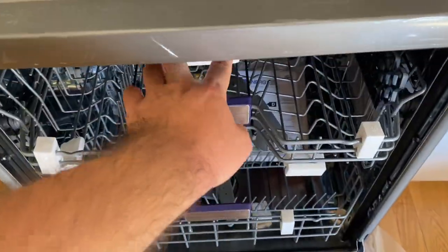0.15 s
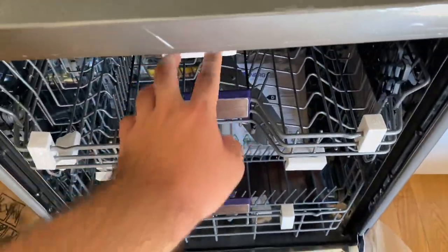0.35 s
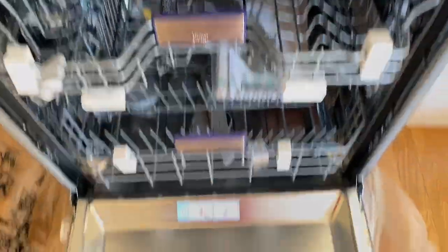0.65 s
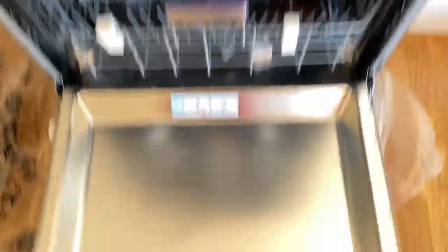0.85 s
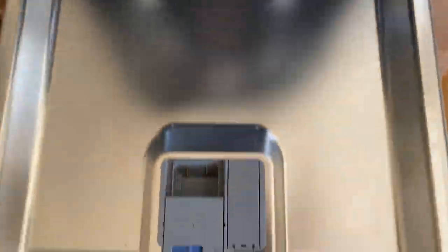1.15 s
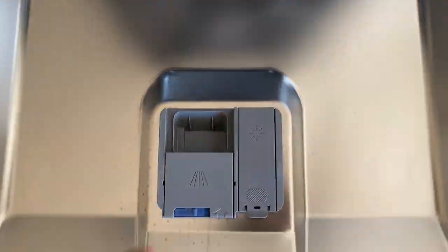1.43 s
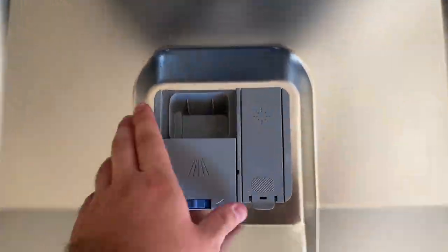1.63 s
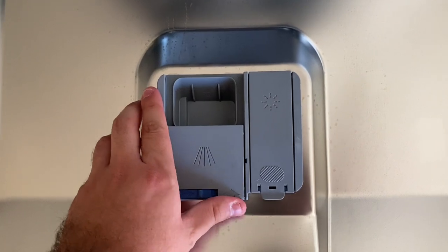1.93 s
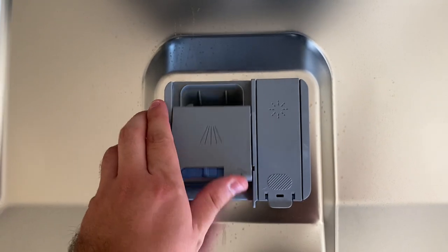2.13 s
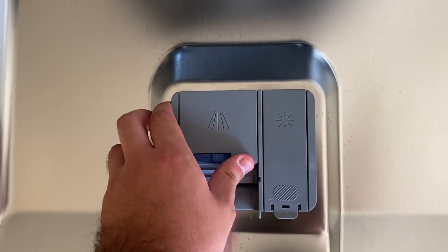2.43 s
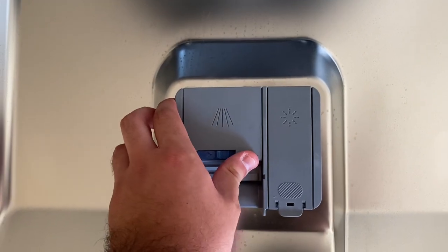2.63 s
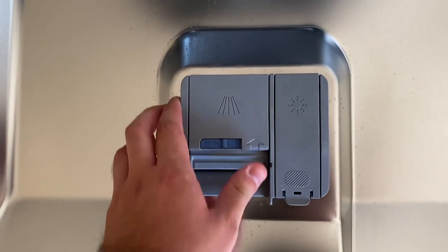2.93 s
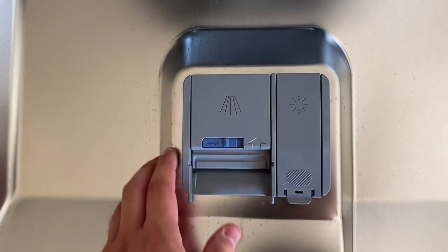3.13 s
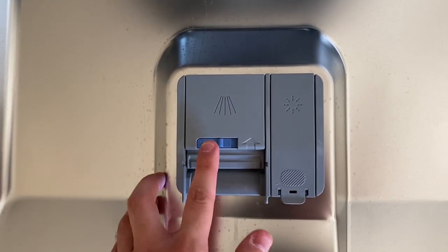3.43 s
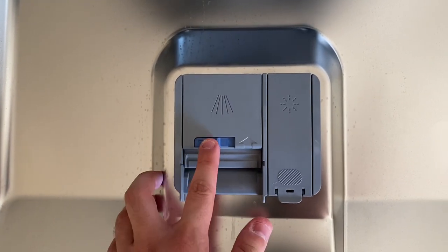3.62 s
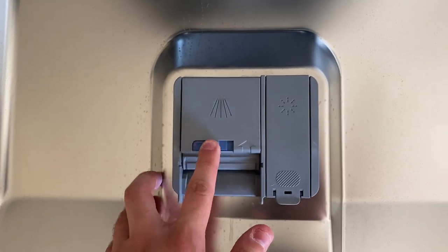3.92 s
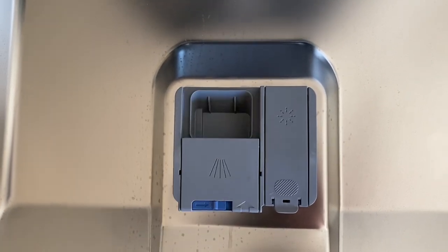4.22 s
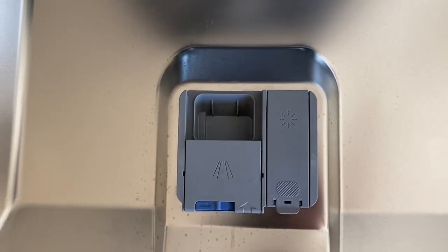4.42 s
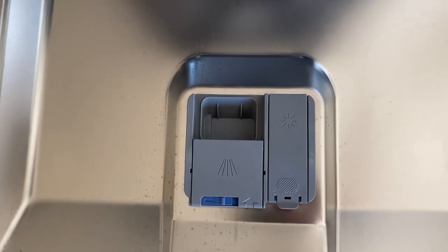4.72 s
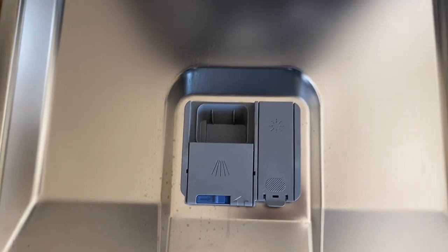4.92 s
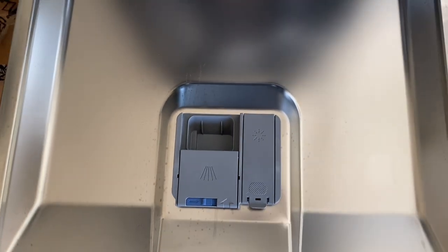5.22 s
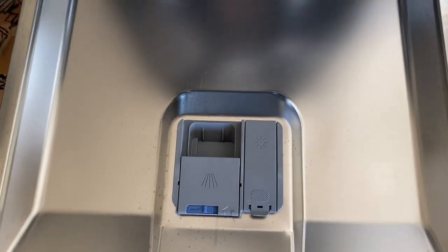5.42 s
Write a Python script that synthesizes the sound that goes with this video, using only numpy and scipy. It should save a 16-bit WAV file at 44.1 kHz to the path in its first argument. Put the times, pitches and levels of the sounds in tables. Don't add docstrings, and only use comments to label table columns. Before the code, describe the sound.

Brief metal rack rattle and thud, quiet rubbing and small clicks, then a sharp click and a hard plastic snap that booms the steel door.

```python
import sys
import numpy as np
from scipy import signal
from scipy.fft import rfft, irfft, next_fast_len
from scipy.io import wavfile
from scipy.ndimage import uniform_filter1d

SR = 44100
rng = np.random.default_rng(int(sys.argv[2]) if len(sys.argv) > 2 else 0)


def generate_wav(sig):
    pcm = np.round(np.clip(np.atleast_2d(sig).T, -1, 1) * 32767).astype(np.int16)
    wavfile.write(sys.argv[1], SR, pcm)


def voltage_ratio(level):
    return 10 ** (np.asarray(level, float) / 20)


N = 245195

# hz, level_db_per_hz
HUM = [(12, -54), (20, -25.5), (34, -21), (81, -3), (100, 1), (120, -26.5), (145, -6), (179, -21),
       (215, -6), (295, -10.5), (328, -13.5), (603, -17), (1300, -27.5), (2320, -40.5), (11000, -64.5),
       (14300, -104), (22000, -120)]
HUM_DB = -48.5
# centre_hz, width_hz, boost_db
HUM_PEAKS = [(97.5, 22, 8), (162, 41, 6), (215, 20, 3.5), (401, 27, 5.5)]
# hz, likeness_0_to_1
SAME = [(40, 0.99), (150, 0.86), (300, 0.83), (600, 0.24), (1600, .15), (5000, 0.033)]
# hz, left_minus_right_db
TILT = [(60, -1.5), (240, -1.5), (950, -0.5), (3770, -2), (15000, 5)]

# hz, level_db_per_hz
RATTLE = [(240, -24), (400, -4.5), (543, -8.5), (694, -11), (860, -4), (942, 1), (2120, -6), (2360, -4),
          (5560, -4), (9790, -22), (11200, -29), (12300, -60.5), (15500, -54.5)]
# hz, level_db_per_hz
RUMBLE = [(18, -52), (30, -5), (69, -8.5), (118, -0.5), (183, -8), (301, -8.5), (362, -15.5), (687, -20),
          (900, -23.5), (1170, -63), (1980, -120)]
# pitch_hz, level_db, t60_s
WIRES = [(310, 0, .04), (510, -1, .035), (680, 0, .03), (940, -4, .03), (2500, -7, .015), (2900, -6, .015),
         (3600, -8, .015), (4600, -7, .012), (5300, -9, .012)]
STOP_S, JOLT_RISE_S, JOLT_FALL_S = .12, 0.013, 0.014
WIRE_DB, WIRE_JOLT_DB, WIRE_SETTLE_DB_PER_S = -36, 15, 700.5
TUB_DB, TUB_JOLT_DB, TUB_SLOWING_DB_PER_S = -24, 13.5, 59.5
TUB_SETTLE_S, TUB_SETTLE_DB_PER_S = .18, 500

# start_s, length_s, level_db, pitch_hz, glide_hz
SQUEAKS = [
    (.092, .014, -35.5, 2902, -500),
    (2.086, .036, -56, 1203, 120),
    (2.23, 0.052, -47.5, 1180, 143),
    (2.262, .014, -39, 1187, -60),
    (3.938, 0.016, -38, 1260, -120),
]
SQUEAK_WOBBLE = .12

# pitch_hz, level_db, t60_s
HOLLOW = [(600, -2, .04), (690, 0, .055), (800, -14, .03), (1000, -9, .04), (1310, -7, .04)]
# pitch_hz, level_db, t60_s
SHELL = [(1890, 0, .035), (2100, -4, .025), (2260, -1, .03), (2420, -2, .035)]
# pitch_hz, level_db, t60_s
EDGE = [(3080, -4, .014), (3400, -4, .014), (4180, -2, .012), (4700, -3, .012), (5300, -4, .01),
        (6010, -2, .012), (6800, 0, .01), (7700, -6, .01), (9700, -3, .012), (10300, -6, .01)]
# hz, level_db_per_hz
CRACK = [(250, -10), (500, -0.5), (700, 6), (1300, -8.5), (1600, -8.5), (2200, -5), (2900, -9), (4300, 1.5),
         (6500, -0.5), (8400, -9), (9800, -5.5), (11200, -14.5), (13500, -20), (16000, -26)]
# time_s, peak_db, hardness_db, left_minus_right_db
THUDS = [
    (1.301, -61, 0, -2),
    (2.263, -30, -2, 3),
    (2.647, -43, 23, .6),
    (2.872, -42.5, -2, 0),
    (2.884, -44, 9, -.6),
    (3.663, -37, 16.5, .6),
    (3.691, -40, 8, 4),
    (3.775, -12.5, 16, 2.5),
]
# time_s, peak_db, hardness_db, left_minus_right_db
CLACKS = [
    (.095, -31, 0.5, -1),
    (.862, -62, 3, 1),
    (2.02, -43.5, -0.5, 1),
    (2.125, -41, -0.5, 7),
    (2.624, -57, 1, -2),
    (3.719, -60.5, -2.5, 20),
    (4.038, -8, 5.5, 0),
    (4.068, -15.5, 12.5, 1),
]
# time_s, peak_db, hardness_db, left_minus_right_db
TICKS = [
    (.113, -29.5, -8.5, -12),
    (.118, -23, 10, 1),
    (.156, -29, -3.5, 2.5),
    (.321, -38, 20, 4),
    (4.008, -29.5, 2.5, 1),
    (4.042, -15, -4.5, 6),
    (4.082, -45, -11, 0.9),
]
# knocks, hollow_shell_edge_db, change_db_per_db_of_hardness
KINDS = [
    (THUDS, (0, -18, -23.5), (0, 0.24, 0.96)),
    (CLACKS, (-5.5, 0, -9.5), (-1.1, 0, 1)),
    (TICKS, (-11.5, -2.5, 0), (-1, -0.79, 0)),
]

# pitch_hz, level_db, t60_s
DOOR = [(102.92, -10, 0.22), (144, -17, 0.079), (165.4, -19.5, 1.1), (196, -16.5, .8),
        (202.65, -12.5, 1.05), (238, -15, 0.47), (220, 10, 0.021), (266.5, -17, 0.91), (269.45, -13, .9),
        (327, -18, .2), (393, -21, 0.54), (438, -23, .4), (580, -24, 0.26)]
# time_s, level_db, contact_ms
BLOWS = [
    (2.022, -32.5, 2.5),
    (2.127, -32.5, 2.1),
    (2.269, -32, 1.06),
    (3.665, -36.5, 1.6),
    (3.691, -43.5, 1.8),
    (4.0428, -3.5, 0.6),
    (4.071, -16.5, 0.86),
]
# time_s, level_db, start_hz, end_hz, t60_s
THUMPS = [
    (0.12, -28.5, 124.4, 67.6, 0.3),
    (0.142, -22, 121.3, 87.4, 0.24),
    (0.167, -24, 96, 72, 0.2),
    (1.079, -21.5, 60, 45, 0.083),
    (2.05, -46, 45, 35, 0.27),
    (2.36, -38, 45, 35, 0.24),
    (5.437, -37, 88.9, 79.4, 0.3),
]

# hz, level_db_per_hz
RUB = [(900, -7.5), (1400, -2), (1750, -10), (2050, -8), (2400, -7), (2750, -9.5), (3200, -5), (3700, 1),
       (4400, 5.5), (5300, 2), (6500, 0), (8400, -11), (9700, -11), (11000, -16.5)]
# start_s, fastest_s, end_s, scrape_db, fizz_re_scrape_db
PALM = [
    (1.41, 1.52, 1.704, -69.5, -20),
    (2.085, 2.105, 2.17, -68, -7),
    (4.4, 4.52, 5.01, -71.5, -28.5),
]
# start_s, fastest_s, end_s, scrape_db, fizz_re_scrape_db
WIPE = [
    (1.66, 1.726, 1.826, -73, -4),
    (1.84, 1.9, 2.16, -74.5, -6),
    (2.012, 2.03, 2.16, -67.5, -19),
]
# start_s, fastest_s, end_s, scrape_db, fizz_re_scrape_db
SLIDE = [
    (2.07, 2.155, 2.298, -57, -6),
    (4.012, 4.038, 4.041, -38, -7),
]
# start_s, fastest_s, end_s, scrape_db, fizz_re_scrape_db
BRUSH = [(2.65, 2.66, 2.66, -64, -25), (2.89, 2.9, 2.8, -68.5, -19), (2.88, 3.0, 3.3, -66.5, 2.5),
         (3.17, 3.224, 3.34, -76.5, 5.5), (2.42, 2.5, 2.56, -80, -12), (2.2, 2.25, 2.29, -65.5, 0.5),
         (4.82, 4.875, 5.09, -61.5, 0.5), (5.12, 5.28, 5.54, -76, -7), (5.19, 5.39, 5.6, -77, -10),
         (5.44, 5.55, 5.7, -70, -7)]
# start_s, fastest_s, end_s, scrape_db, fizz_re_scrape_db
PRESS = [
    (3.785, 3.79, 3.81, -45.5, -14.5),
    (3.8, 3.9, 3.98, -62.5, -17),
    (3.92, 3.945, 4.005, -61.5, -14.5),
]
# strokes, drag_re_scrape_db, drag_pitch_hz, pitch_rise_over_stroke, resonant_share_0_to_1, width_hz
SURFACES = [
    (PALM, 8.5, 2000, 0.033, 0.37, 230),
    (WIPE, 8.1, 1950, .03, 0.35, 370),
    (SLIDE, 3, 2150, -0.11, 0.51, 410),
    (BRUSH, 0.71, 1600, .02, .4, 120),
    (PRESS, 10, 680, .03, 0.61, 500),
]
ENDS_DB, BEND, DRAG_LINGERS, FIZZ_FADES = 19.5, 1.2, .3, .6

# hz, t60_s
KITCHEN = [(100, 0.76), (400, 0.87), (1500, 0.92), (5000, 0.79), (9000, 0.61), (14000, 0.32)]
# hz, left_lead_rad
PORTS = [(50, .02), (500, 0.31), (2400, 1.3), (4000, 1.2), (8000, 1.7), (16000, 0.89)]
# hz, gain_db
MIC = [(20, -2), (1500, 1), (2600, 1), (2900, 1), (5000, -1.5), (6800, 2), (8400, -1.5), (9800, 1),
       (11200, -3.5), (12000, -20), (13500, -2.5), (15500, -12), (16500, -36.5), (22050, -60)]


def evened(x):
    return x / np.sqrt(np.mean(x ** 2) + 1e-20)


def peaked(x):
    return x / abs(x).max()


def read(points, hz):
    f, value = np.transpose(points)
    return np.interp(np.log(hz + 1), np.log(f + 1), value)


def add(mix, s, sound):
    part = mix[..., round(s * SR):][..., :sound.shape[-1]]
    part += sound[..., :part.shape[-1]]


def coloured(x, spectrum):
    size = next_fast_len(len(x))
    gain = voltage_ratio(read(spectrum, np.fft.rfftfreq(size, 1 / SR)))
    return evened(irfft(rfft(x, size) * gain, size)[:len(x)])


def bands(x, edges_hz):
    filters = [signal.butter(3, [lo, hi], "bandpass", fs=SR, output="sos")
               for lo, hi in zip(edges_hz, edges_hz[1:])]
    return [signal.sosfilt(sos, x) for sos in filters]


def grit(per_s, spread_db, smooth, size=N):
    sizes = voltage_ratio(spread_db * np.minimum(rng.exponential(1, size), 4))
    ticks = sizes * (rng.random(size) < per_s / SR)
    return evened(ticks * rng.standard_normal(size)) + smooth * rng.standard_normal(size)


def ring(modes, seconds, detune):
    t = np.arange(round(seconds * SR)) / SR
    chance = rng.uniform(-1, 1, len(modes))
    return sum(voltage_ratio(db - 60 * t / t60) * np.sin(2 * np.pi * hz * (1 + detune * a) * t)
               for (hz, db, t60), a in zip(modes, chance))


def resonate(x, hz, width_hz):
    turn = np.exp(2j * np.pi * np.cumsum(hz) / SR)
    r = np.exp(-np.pi * width_hz / SR)
    return 2 * (turn * signal.lfilter([1 - r], [1, -r], x / turn)).real


def alike(left, other, same):
    return same * left + np.sqrt(1 - same ** 2) * other


def hum():
    frames, hz = N // 512 + 5, np.fft.rfftfreq(2048, 1 / SR)
    a, b, c, d, patches = rng.standard_normal((frames, 1025, 5)).T
    patches = uniform_filter1d(patches, size=12, axis=0)
    patches = evened(uniform_filter1d(patches, size=10, axis=1))
    same = np.clip(read(SAME, hz), -1, 1)[:, None]
    left = a + 1j * b
    z = np.array([left, alike(left, c + 1j * d, same)])
    peaks_db = sum(db / (1 + (2 * (hz - f) / w) ** 2) for f, w, db in HUM_PEAKS)
    shape_db = read(HUM, hz) + peaks_db
    tilt_db = np.multiply.outer([.5, -.5], read(TILT, hz))[..., None]
    z *= voltage_ratio(shape_db[:, None] + 2.0 * patches + tilt_db)
    return voltage_ratio(HUM_DB) * evened(signal.istft(z, nperseg=2048, noverlap=1536)[1][:, :N])


def rack():
    t = np.arange(SR) / SR
    jolt = np.exp(-np.where(t < STOP_S, (STOP_S - t) / JOLT_RISE_S, (t - STOP_S) / JOLT_FALL_S))
    settling_s = np.maximum(t - STOP_S - JOLT_FALL_S, 0)
    wire_db = WIRE_DB + WIRE_JOLT_DB * jolt - WIRE_SETTLE_DB_PER_S * settling_s
    tub_db = TUB_DB + TUB_JOLT_DB * jolt - TUB_SLOWING_DB_PER_S * t
    tub_db -= TUB_SETTLE_DB_PER_S * np.maximum(t - TUB_SETTLE_S, 0)
    ticks = coloured(grit(4000, spread_db=2.5, smooth=0.91, size=SR), RATTLE)
    clanks = np.zeros(SR)
    for mode in WIRES:
        strikes = grit(160, spread_db=3.0, smooth=0, size=SR)
        clanks += signal.oaconvolve(strikes, ring([mode], .08, 0))[:SR]
    tub = coloured(grit(300, spread_db=2.5, smooth=0.9, size=SR), RUMBLE)
    out = np.zeros(N)
    out[:SR] = voltage_ratio(wire_db - 3.5) * (ticks + voltage_ratio(-4.5) * evened(clanks)) + voltage_ratio(tub_db - 3.0) * tub
    return out


def squeaks():
    out, coarse = np.zeros(N), grit(500, spread_db=2.5, smooth=0.62)
    for s, length, db, hz, glide_hz in SQUEAKS:
        u = np.arange(0, length, 1 / SR) / length
        wobble = evened(uniform_filter1d(coarse[round(s * SR):][:len(u)], size=60))
        pitch_hz = (hz + glide_hz * u) * (1 + SQUEAK_WOBBLE * wobble)
        swell = np.sin(np.pi * u ** 0.77) ** 2
        add(out, s, voltage_ratio(db) * swell * np.sin(2 * np.pi * np.cumsum(pitch_hz) / SR))
    return out


def knocks():
    near, far = np.zeros((2, N)), np.zeros(N)
    t = np.arange(round(.06 * SR)) / SR
    rise = 1 - np.exp(-t / 0.00062)
    hits = [(s, db + np.add(colour_db, np.multiply(lean, hard_db)), pan_db)
            for rows, colour_db, lean in KINDS for s, db, hard_db, pan_db in rows]
    shares, fades_s = (.3, .5, .9), (.004, .004, .003)
    wets = voltage_ratio([-4., 1.5, -.5])
    for s, group_db, pan_db in sorted(hits, key=lambda hit: hit[0]):
        chatter = rng.standard_normal(len(t)) * np.exp(-t / 0.0041) * rise
        cracks = bands(coloured(rng.standard_normal(len(t)), CRACK), [480, 1150, 2750, 16500])
        shove = np.diff(np.hanning(56))
        rings = [signal.fftconvolve(shove, ring(HOLLOW, .06, 0.022))]
        rings += [signal.fftconvolve(chatter, ring(modes, 0.036, 0.012)) for modes in (SHELL, EDGE)]
        pan = voltage_ratio([[pan_db / 2], [-pan_db / 2]])
        for gain, crack, rung, share, fade_s, wet in zip(voltage_ratio(group_db), cracks, rings, shares, fades_s, wets):
            rung = peaked(rung[:len(t)])
            sound = share * peaked(crack * np.exp(-t / fade_s) * rise) + np.sqrt(1 - share ** 2) * rung
            add(near, s - .001, voltage_ratio(2.0) * gain * sound * pan)
            add(far, s, wet * gain * (peaked(crack * np.exp(-t / .018)) + .35 * rung))
    return near, far


def door():
    out = np.zeros(N)
    panel = peaked(bands(ring(DOOR, 1.2, 0), [75, 3000])[0])
    for s, db, ms in BLOWS:
        push = np.hanning(round(ms * SR / 1000) + 2)
        add(out, s, voltage_ratio(db) * np.convolve(panel, push / push.sum()))
    for s, db, from_hz, to_hz, t60 in THUMPS:
        t = np.arange(0, t60, 1 / SR)
        hz = to_hz + (from_hz - to_hz) * np.exp(-t / 0.081)
        tone = np.sin(2 * np.pi * np.cumsum(hz) / SR)
        add(out, s, voltage_ratio(db - 60 * t / t60) * tone * (1 - np.exp(-t / 0.013)))
    return out


def rubs():
    treble = [(12000, -15.5), (14000, -12.0), (16000, -11.0)]
    grain = coloured(grit(2900, spread_db=3.0, smooth=2.3), RUB + treble)
    drag, scrape, fizz = map(evened, bands(grain, [900, 2700, 8200, 16000]))
    coarse = grit(500, spread_db=2.5, smooth=0.62)
    grip = uniform_filter1d(uniform_filter1d(coarse[::-1], size=500), size=300)
    uneven_db = 1.3 * evened(grip)
    out = np.zeros(N)
    for strokes, drag_db, lid_hz, rise, share, width_hz in SURFACES:
        for start, top, end, db, fizz_db in strokes:
            live = slice(round(start * SR), min(round(end * SR), N))
            t = np.arange(live.start, live.stop) / SR
            slowness = np.where(t < top, (top - t) / (top - start), (t - top) / (end - top))
            slow_db = ENDS_DB * np.clip(slowness, 0, 1) ** BEND
            on = np.clip(np.minimum(t - start, end - t) / 0.003, 0, 1)
            hz = lid_hz * (1 + rise * (t - top) / (end - start))
            mode = evened(resonate(resonate(coarse[live], hz, width_hz), hz, width_hz))
            overtone = evened(resonate(coarse[live], 2.2 * hz, 300))
            lid = (1 - share) * drag[live] + share * mode + voltage_ratio(-21.0) * overtone
            stroke = scrape[live] + voltage_ratio(drag_db + DRAG_LINGERS * slow_db) * lid
            stroke += voltage_ratio(fizz_db - FIZZ_FADES * slow_db) * fizz[live]
            out[live] += on * voltage_ratio(db - slow_db + uneven_db[live]) * stroke
    return out


def kitchen(x, gap_s=0.002):
    taps = rng.standard_normal((2, SR))
    hz, t, z = signal.stft(taps, SR, nperseg=256)
    z[1] = alike(z[0], z[1], np.clip(read(SAME, hz), -1, 1)[:, None])
    decay = voltage_ratio(-60 * t / read(KITCHEN, hz)[:, None])
    tail = signal.istft(z * decay, SR, nperseg=256)[1]
    tail *= np.clip(np.arange(tail.shape[1]) / SR / gap_s - .5, 0, 1)
    return signal.fftconvolve(x[None], tail / np.linalg.norm(tail[0]), axes=1)[:, :N]


def ports(x):
    size = next_fast_len(N + 4096)
    hz = np.fft.rfftfreq(size, 1 / SR)
    phase = np.exp(.5j * np.outer([1, -1], read(PORTS, hz)))
    return irfft(rfft(x, size) * voltage_ratio(read(MIC, hz)) * phase, size)[:, :N]


def scene():
    floor, roll, rub = hum(), rack(), squeaks()
    (knock, crack), boom = knocks(), door()
    rub = rub + rubs()
    send = voltage_ratio(-5.5) * roll + voltage_ratio(-9.5) * rub + voltage_ratio(-11.0) * crack + voltage_ratio(-7.5) * boom
    near = voltage_ratio(-2.0) * roll + voltage_ratio(3.5) * rub + knock + boom * voltage_ratio([[-.6], [.6]])
    return ports(near + kitchen(send) + floor)


def band_limit(x):
    return signal.sosfilt(signal.butter(12, 16490, fs=SR, output="sos"), x)


def record(dry):
    cut = signal.sosfilt(signal.butter(3, 32, "highpass", fs=SR, output="sos"), dry)
    return band_limit(cut)


dry = scene()
out = record(dry)
generate_wav(out)
```